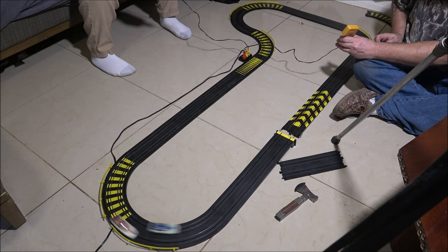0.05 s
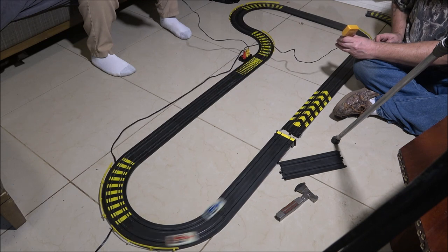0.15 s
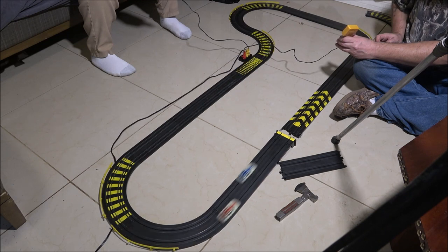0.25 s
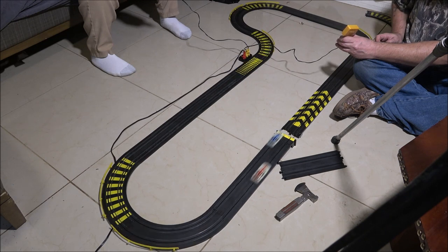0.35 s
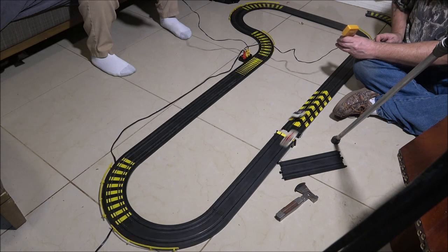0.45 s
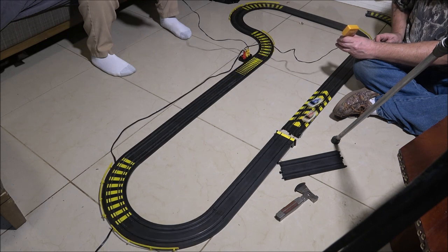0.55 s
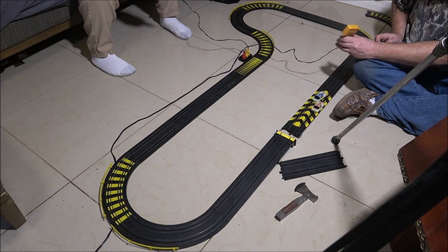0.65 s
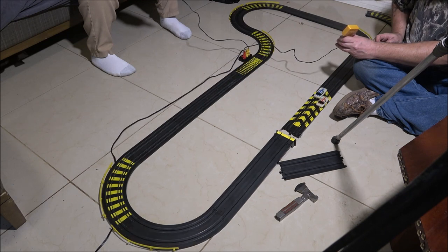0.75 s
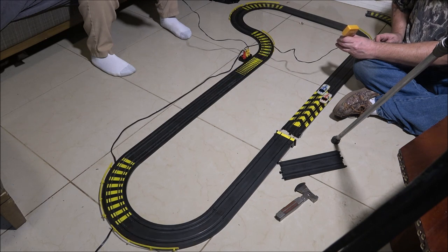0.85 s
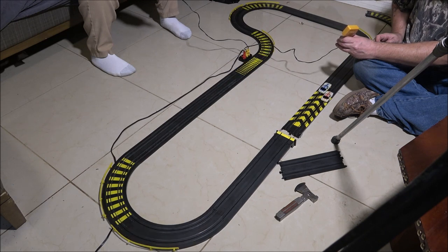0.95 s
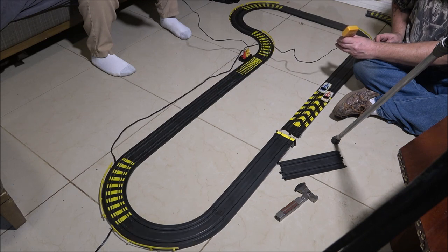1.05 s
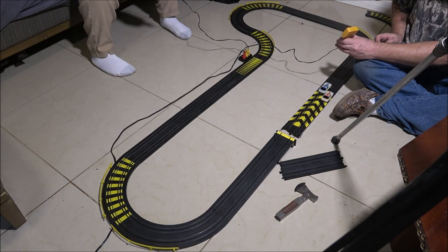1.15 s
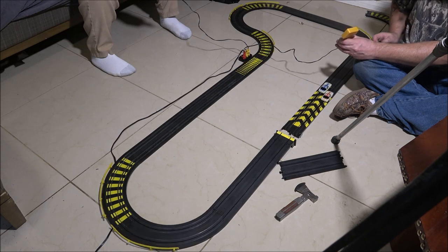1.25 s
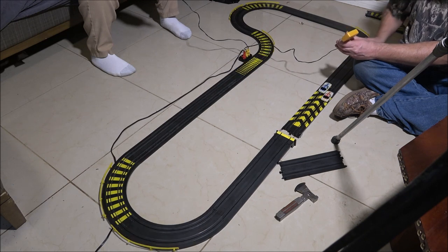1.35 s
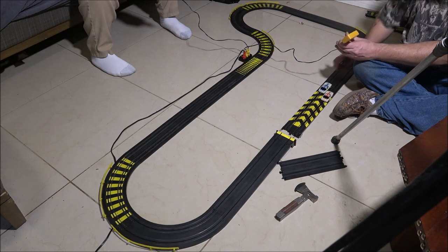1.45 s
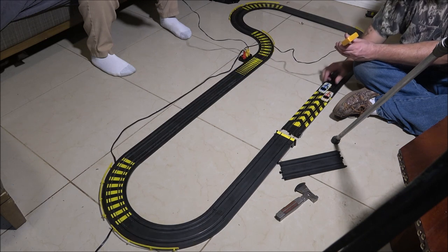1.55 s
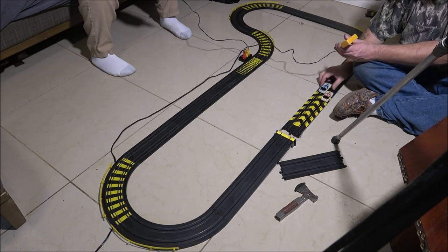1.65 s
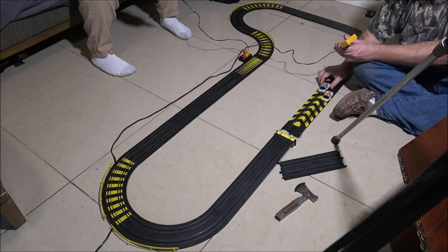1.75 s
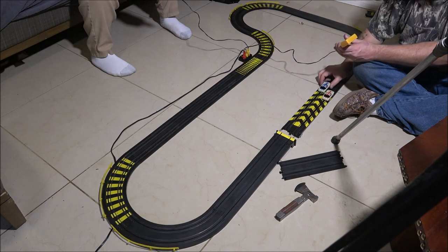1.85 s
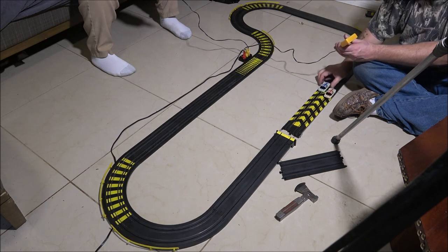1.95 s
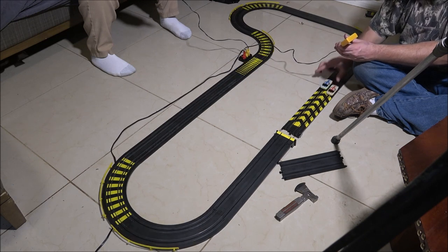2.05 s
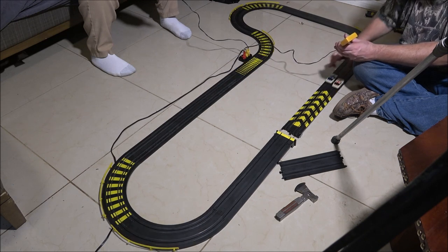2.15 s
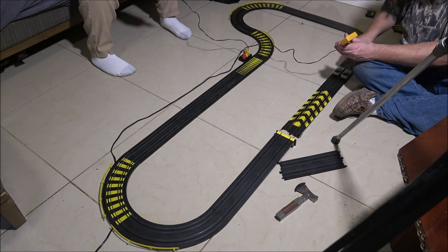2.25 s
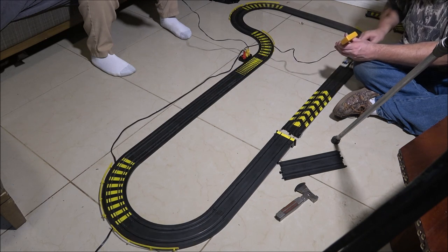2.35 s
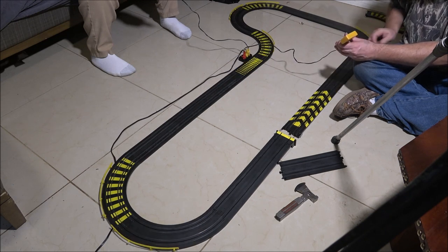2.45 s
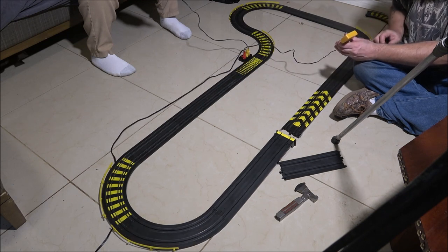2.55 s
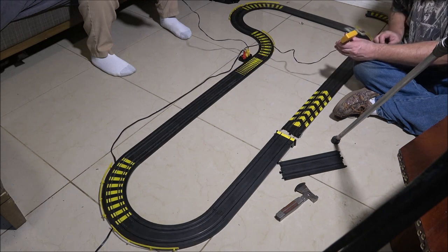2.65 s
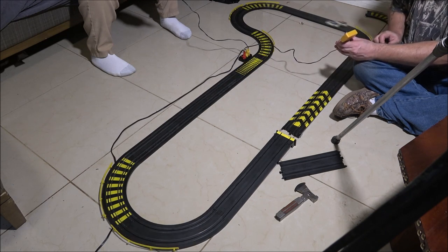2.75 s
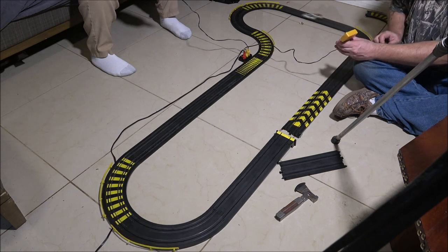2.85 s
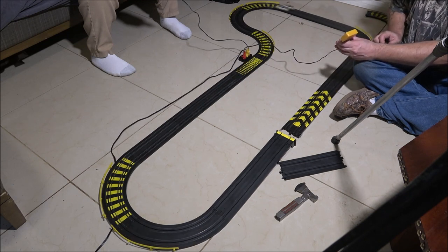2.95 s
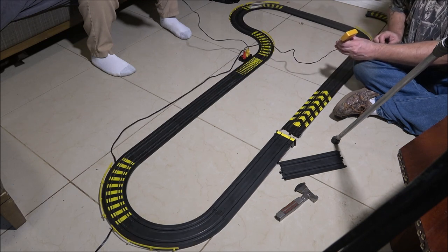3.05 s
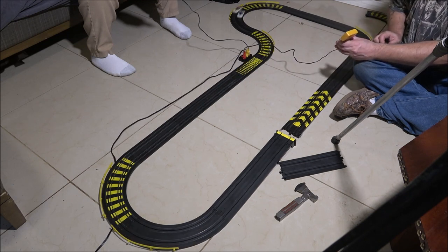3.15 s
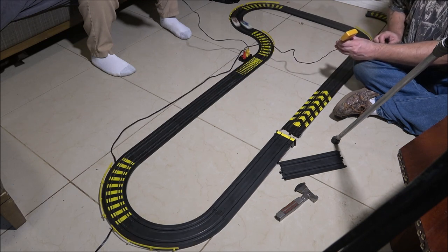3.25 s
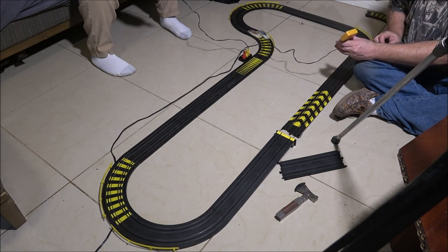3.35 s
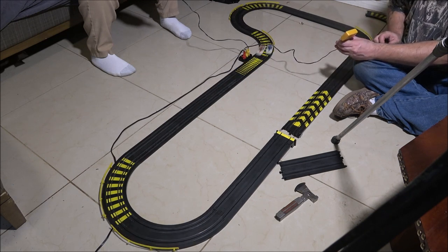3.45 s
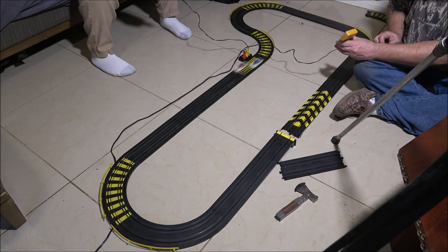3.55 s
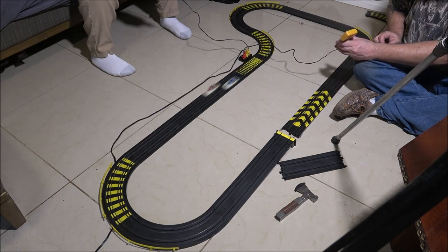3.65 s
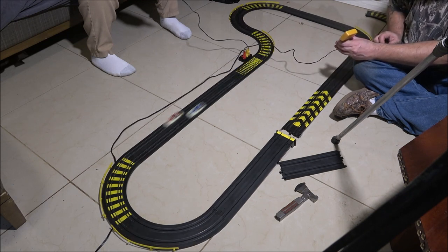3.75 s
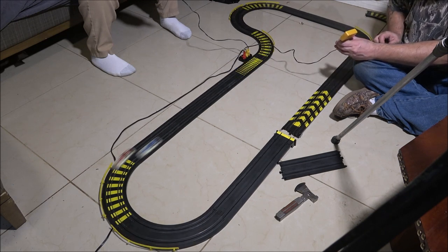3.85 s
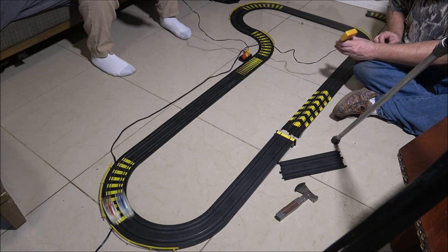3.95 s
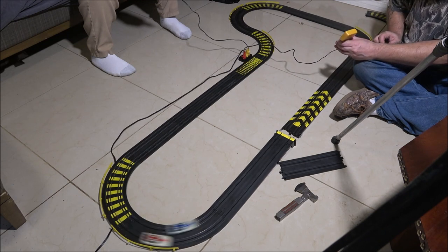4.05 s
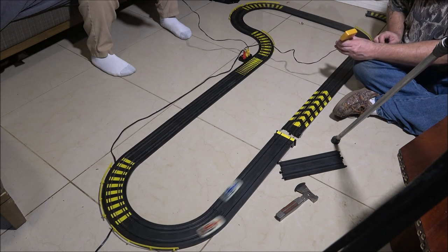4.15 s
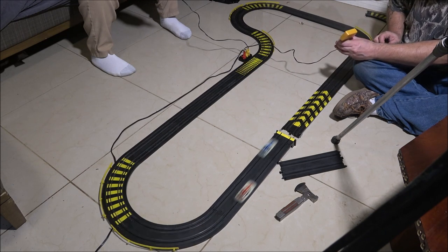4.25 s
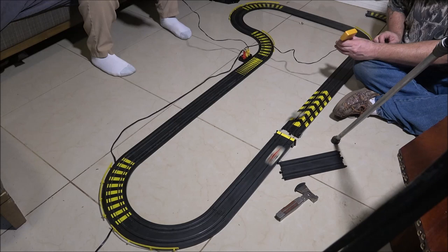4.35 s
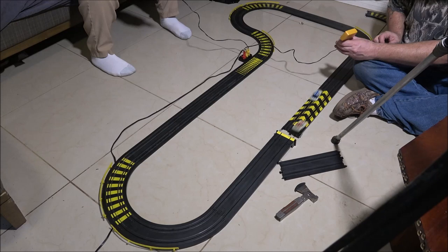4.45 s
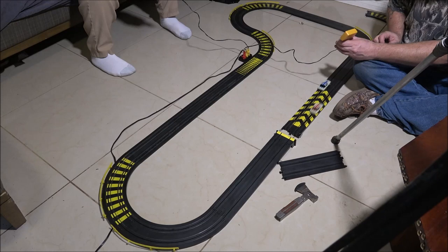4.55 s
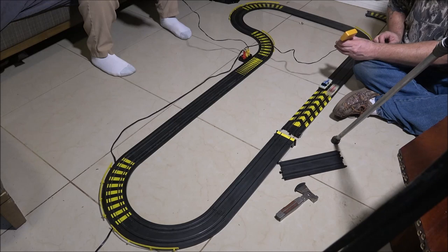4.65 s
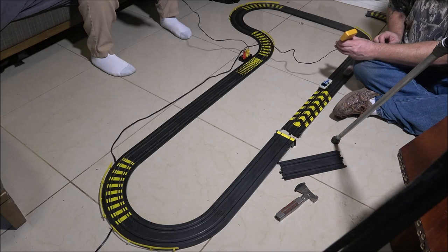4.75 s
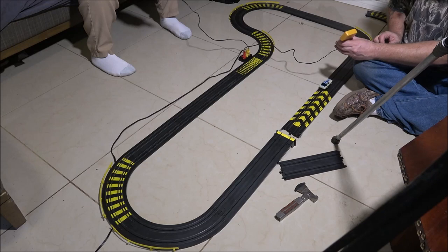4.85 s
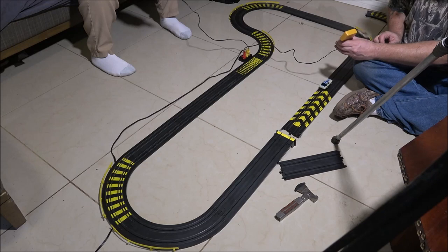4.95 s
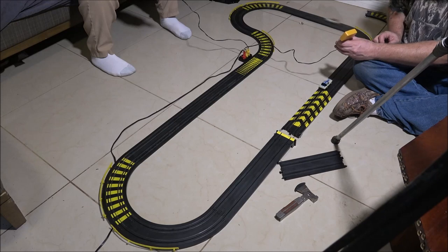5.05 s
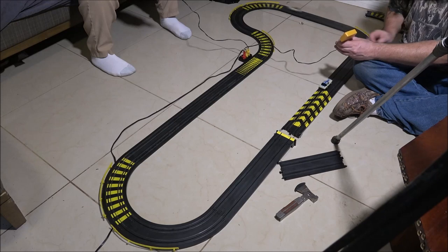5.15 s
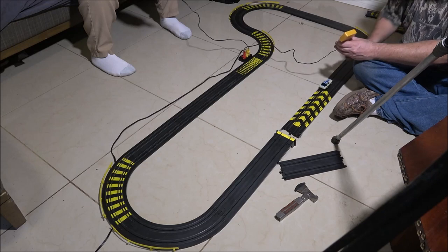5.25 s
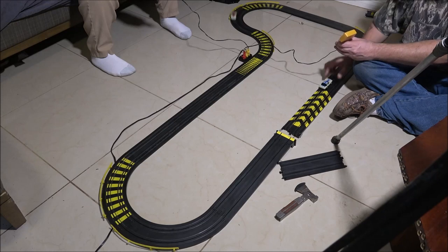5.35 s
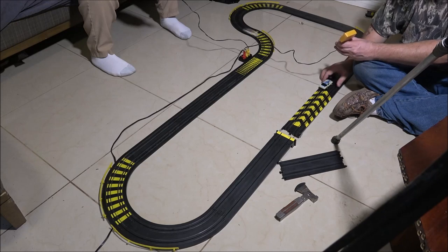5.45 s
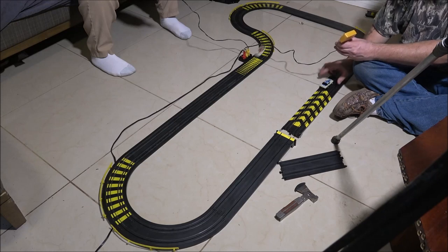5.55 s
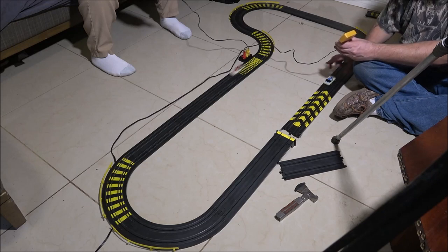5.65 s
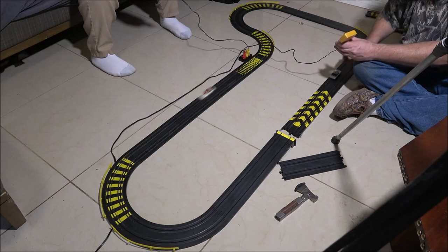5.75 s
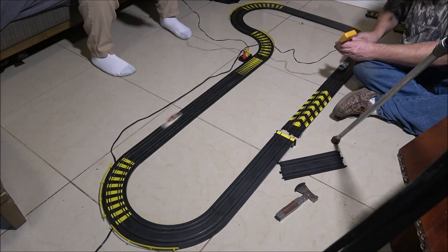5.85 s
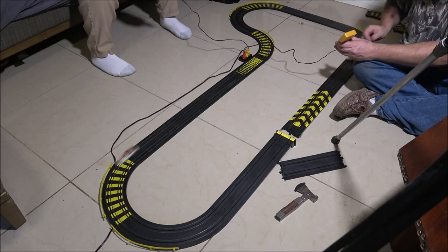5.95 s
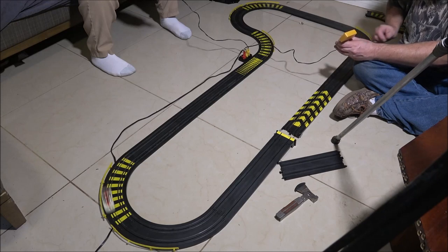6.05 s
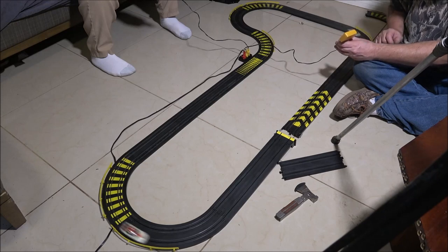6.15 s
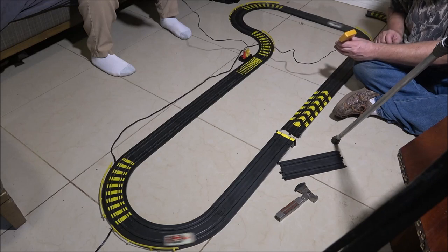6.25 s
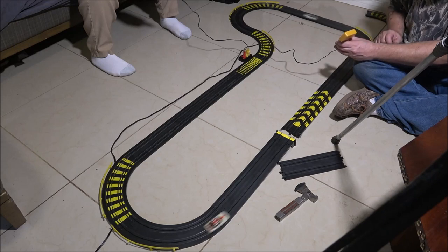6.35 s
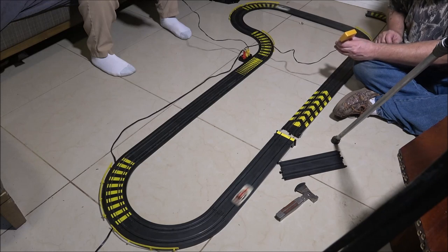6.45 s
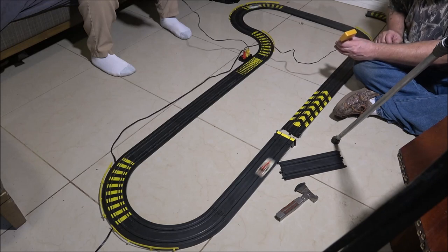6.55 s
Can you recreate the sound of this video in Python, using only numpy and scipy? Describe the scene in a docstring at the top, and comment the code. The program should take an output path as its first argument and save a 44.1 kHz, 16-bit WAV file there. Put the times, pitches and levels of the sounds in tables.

```python
"""Two toy slot cars whirr round a plastic track on a tiled floor, stall, are pushed on by hand and race off.
Two shaky gear tones make the whirr; thousands of tiny random blows make the chatter, scrape and drumming.
Bursts of noise make the clacks over rail joints and the knocks of the plastic bodies.
Dying tones make the floor bumps and the ringing track pieces.
Around them are hard-room echoes, soft air noise, a mains hum and, during the stall, a thin whine."""
import sys
import numpy as np
from scipy import signal
from scipy.fft import rfft, irfft
from scipy.io import wavfile

SR = 44100
rng = np.random.default_rng(int(sys.argv[2]) if len(sys.argv) > 2 else 0)


def int16_out(signal):
    """Quantize to a 16-bit WAV file."""
    q = np.round(np.clip(np.atleast_2d(signal).T, -1, 1) * 32767)
    wavfile.write(sys.argv[1], SR, q.astype(np.int16))


N = 290619
TIME = np.arange(N) / SR
EDGE_HZ = 15880


def amp(db):
    """Turns decibels into a gain."""
    return 10 ** (np.asarray(db) / 20)


def unit(x):
    """Scales a sound to an rms of 1."""
    return x / np.sqrt(np.mean(x ** 2) + 1e-20)


def read(points, hz):
    """Reads a table of pitches and values between its points, on a log-frequency axis."""
    f, value = np.transpose(points)
    return np.interp(np.log(hz + 1), np.log(f + 1), value)


def follow(points):
    """Draws straight lines through a table of times and values, one value per sample."""
    return np.interp(TIME, *np.transpose(points))


def add(mix, s, sound):
    """Mixes a sound in at time s, in seconds."""
    part = mix[max(round(s * SR), 0):][:len(sound)]
    part += sound[:len(part)]


def colour(x, points, tilt_db=0):
    """Filters a sound to a given spectrum without pre-echo, tilted in dB per octave above 500 Hz."""
    hz = abs(np.fft.fftfreq(8192, 1 / SR))
    octaves = np.log2(np.maximum(hz, 500) / 3000)
    log_gain = np.log(amp(read(points, hz) + tilt_db * octaves))
    # this choice of phase puts the filter's energy as early as possible
    response = np.exp(np.conj(signal.hilbert(log_gain)))
    taps = np.fft.ifft(response).real[:4096]
    return signal.oaconvolve(x, taps)[:len(x)]


def wander(hz):
    """Makes a random curve of rms 1 that changes mostly at rates below hz."""
    t = np.arange(16384) / 2400
    rates = np.fft.rfftfreq(len(t), t[1])
    spectrum = rfft(rng.standard_normal(len(t))) / (1 + (rates / hz) ** 4)
    return unit(np.interp(TIME, t, irfft(spectrum)))


def impacts(per_s, spread_db):
    """Scatters tiny blows of uneven size and random sign."""
    sizes = amp(spread_db * np.minimum(rng.exponential(1, N), 4)) * rng.choice([-1, 1], N)
    return sizes * (rng.random(N) < per_s / SR)


def track_ring(x, ring_db):
    """Adds the ringing of the track to a blow: each mode is a sine that dies away, faster if it is wide."""
    # ringing of the track pieces: pitch_hz, width_hz, level_db [relative]
    track_modes = [(1020, 16, -6), (1156, 9.8, -15), (1850, 67, -1), (2350, 150, -1.5), (2740, 80, -31),
                   (3670, 1200, 8)]
    t = np.arange(SR // 8) / SR
    modes = np.zeros(len(t))
    for hz, width, db in track_modes:
        decay = np.exp(-np.pi * width * t)
        modes += amp(db) * np.sqrt(width) * decay * np.sin(2 * np.pi * hz * t)
    ring = signal.oaconvolve(x, modes / np.linalg.norm(modes))[:len(x)]
    return x + amp(ring_db) * ring


def reflections(x):
    """Makes the dense echoes of the room, each pitch range dying at its own rate."""
    # echo life: pitch_hz, time_to_fall_60_db_s
    echo_times = [(200, 0.29), (1300, 0.27), (3500, 0.35), (9000, 0.16), (16000, 0.23)]
    length = SR // 3
    taps = rng.standard_normal(length) * (rng.random(length) < .12)
    taps *= np.arange(length) > 150  # a short gap before the first echo
    hz, t, z = signal.stft(taps, SR, nperseg=256)
    fade = amp(-60 * t / read(echo_times, hz)[:, None])
    tail = signal.istft(z * fade, SR, nperseg=256)[1]
    return signal.oaconvolve(x, tail / np.linalg.norm(tail))[:N]


def room(x, wet_db, shifts_per_s=7):
    """Adds three sets of echoes that fade in and out in turn, so the echo pattern keeps shifting."""
    echoes = np.zeros(N)
    for k in range(3):
        echoes += reflections(x * np.cos(np.pi * (shifts_per_s * TIME + k / 3)))
    echoes /= np.sqrt(1.5)
    return (x + amp(wet_db) * echoes) / np.hypot(1, amp(wet_db))


def swells(rows):
    """Makes dB curves that rise and fall smoothly around each pass, one for each gain column."""
    return sum(np.outer(dbs, np.exp(-((TIME - s) / half) ** 2)) for s, half, *dbs in rows)


def gears(mesh, jitter, overtone_db):
    """Whirrs like one car: the tooth rate shakes as wheels grip and slip, and teeth rattle in bursts."""
    hz = follow(mesh) * (1 + jitter * wander(227.0) + .01 * wander(14.3))
    phase = 2 * np.pi * np.cumsum(hz) / SR
    tone = np.sin(phase) + amp(overtone_db) * np.sin(2 * phase)
    return unit(tone * amp(4.7 * np.minimum(wander(164), 2.2)))


def whirr(first_db, second_db):
    """Sounds both cars' gears in the room, each swelling by its own load."""
    # speed of the first car, then of the second: time_s, gear_mesh_hz
    first_mesh = [(0, 1635), (.43, 1372), (.9, 1446), (2.1, 1067), (2.3, 1203), (2.58, 1768), (2.9, 1730),
                  (3.1, 1570), (3.98, 1655), (4.12, 1556), (4.3, 1570), (4.42, 1396), (4.88, 1557),
                  (5.33, 1931), (5.45, 1624), (5.86, 1843), (6.17, 1483), (6.59, 1616)]
    second_mesh = [(0, 1800), (.45, 1750), (1.0, 2150), (2.1, 1850), (2.45, 2300), (3.05, 1780),
                   (3.5, 2280), (3.8, 1900), (4.7, 1600), (5.3, 2200), (5.88, 1330), (6.2, 1650),
                   (6.59, 1800)]
    first = amp(first_db) * gears(first_mesh, jitter=.043, overtone_db=-11.5)
    second = amp(second_db - 2) * gears(second_mesh, jitter=.068, overtone_db=-22)
    return room(first + second, wet_db=-3.0)


def chatter(bounce):
    """Rattles the chassis on the hollow track: random blows that come stronger and weaker with the hops."""
    # tone of the chatter: pitch_hz, level_db [relative, per Hz]
    chatter_tone = [(300, -35.5), (800, -22), (1150, -9.5), (1500, -1), (1850, -1.5), (2400, -3),
                    (2750, -4), (3400, -4), (4200, -9.5), (7000, -21.5), (15000, -24)]
    blows = impacts(2400, spread_db=2.5) * amp(2.45 * bounce + wander(26))
    return unit(room(colour(track_ring(blows, ring_db=-24), chatter_tone), wet_db=0.0))


def shoes(bounce):
    """Scrapes metal pickup shoes on the rails in thousands of tiny ticks, with a treble that dulls and returns."""
    # tone of the scrape: pitch_hz, level_db [relative, per Hz]
    scrape_tone = [(700, -20.5), (2000, -1), (3500, -4), (4500, 0), (6000, 2), (7200, 1), (9000, 1),
                   (11000, -2.5), (13000, -10), (16000, -20.5)]
    # duller during the first run's slowing, bright again by the restart:
    # time_s, share_of_treble_lost [0 to 1]
    dulling = [(.45, 0.2), (.78, 0.36), (2.1, .02)]
    ticks = impacts(4500, spread_db=1.0) * amp(0.5 * bounce + 0.89 * wander(53))
    scrape = room(colour(ticks, scrape_tone), wet_db=-2.5, shifts_per_s=23)
    treble = signal.sosfiltfilt(signal.butter(2, 9500, "high", fs=SR, output="sos"), scrape)
    return unit(scrape - np.clip(follow(dulling), 0, 1) * treble)


def drumming():
    """Drums on hollow pieces of track: random blows, with the lower pitches brought out."""
    # tone of the drumming: pitch_hz, level_db [relative, per Hz]
    drum_tone = [(100, -28), (200, -22), (400, -14), (650, -11.5), (860, -9), (955, 2), (1035, -1.5),
                 (1120, 5.5), (1230, 1), (3000, -54)]
    blows = impacts(2000, spread_db=1.5)
    return unit(room(colour(track_ring(blows, ring_db=-17), drum_tone), wet_db=3))


def cars():
    """Runs whirr, chatter, scrape and drumming at the drive's level, each with its swells; silent in the stall."""
    # how hard the cars are driven, heard as the running level: time_s, level_db
    drive_points = [(0, -25), (.25, -29.5), (.47, -30), (.68, -30.5), (.8, -37.5), (1.03, -47), (1.12, -49),
                    (1.86, -50.5), (2.05, -45.5), (2.13, -36), (2.33, -36), (2.8, -31.5), (3.12, -27),
                    (3.3, -29.5), (3.9, -26.5), (4.45, -29.5), (4.8, -34), (5.36, -28.5), (5.66, -29),
                    (5.8, -31.5), (6.03, -28.5), (6.35, -31), (6.59, -27)]
    # surges as the cars lean into a bend or pull away, each car's gears loaded by its own amount:
    # centre_s, half_length_s, chatter_gain_db, first_whirr_gain_db, second_whirr_gain_db
    surges = [(.04, 0.21, 6, 10.5, -3), (.38, 0.085, 7, 12, 9), (.9, 0.062, -1, 9, 3),
              (2.26, 0.084, 4.5, 4, 13), (2.4, 0.11, 5.5, 14, 15.5), (3.07, 0.057, 6, 9, 4),
              (3.5, 0.064, 3.5, -10, 7.5), (3.79, .08, 6.5, 10, 7), (3.99, 0.08, 7, 8, 12.5),
              (4.13, 0.066, 4.5, 14, 5), (4.31, 0.072, 7, 10, 8), (4.85, 0.084, 2.5, 9.5, 5),
              (5.28, 0.075, 0.5, 10.5, 7), (5.55, 0.046, 3, 5, 7), (5.87, 0.099, 4.5, 9.5, 9),
              (6.06, .04, 5.5, 10, 0), (6.2, 0.073, 4.5, 6, 3), (6.58, 0.069, 5.5, 10, 11)]
    # passes over the bumpy stretch, where the shoes scrape harder: centre_s, half_length_s, gain_db
    bumpy_passes = [(.61, 0.042, 8.5), (4.56, 0.062, 5)]
    # passes over hollow pieces of track that drum: centre_s, half_length_s, gain_db
    hollow_passes = [(.54, .03, 4), (.97, 0.12, 6.5), (2.17, 0.035, 8.5), (3.57, 0.21, 5), (3.82, 0.13, 11),
                     (4.49, 0.048, 11.5), (4.66, 0.031, 6), (5.8, .18, 9)]
    moving = np.interp(TIME, [1.035, 1.1, 1.74, 1.93], [1, 0, 0, 1])
    drive = moving * amp(follow(drive_points))
    surge, first, second = swells(surges)
    bumpy, = swells(bumpy_passes)
    hollow, = swells(hollow_passes)
    bounce = wander(72)  # the light cars hop on the rails
    running = amp(surge) * chatter(bounce)
    running += amp(-10.5) * whirr(first, second)
    running += amp(-0.12 + bumpy) * shoes(bounce)
    running += amp(-12.5 + hollow) * drumming()
    return drive * running


def steady_tones(lines):
    """Sums sine tones, each with a slowly drifting phase; the sqrt(2) makes each level an rms level."""
    return sum(amp(db) * np.sqrt(2) * np.sin(2 * np.pi * hz * TIME + wander(2.7)) for hz, db in lines)


def background():
    """Lays down room air and hiss as coloured noise, mains hum as low sines, and a whine in the stall."""
    # room air and hiss: pitch_hz, level_db [relative, per Hz]
    air_tone = [(20, -7), (60, -8), (88, -19), (150, -7), (400, -7.5), (500, -10), (700, -17), (1500, -19),
                (4000, -23), (9000, -25.5), (15000, -35)]
    # mains hum: pitch_hz, level_db
    hum_lines = [(59, -68.5), (119.8, -65), (177.5, -65.5), (240, -64.5), (360.6, -66)]
    # thin whine while the cars stand still: pitch_hz, level_db
    whine_lines = [(2277, -71), (2585, -74), (2762, -72), (3601, -77)]
    air = amp(-53) * unit(colour(rng.standard_normal(N), air_tone))
    stalled = np.interp(TIME, [1.08, 1.16, 1.56, 1.6], [0, 1, 1, 0])
    return air + steady_tones(hum_lines) + stalled * steady_tones(whine_lines)


def joints():
    """Clacks the metal shoes over gaps between track pieces: short noise buzzes that also ring the track."""
    # shoes hitting rail joints: start_s, level_db [before ringing, colour and room]
    joint_hits = [(.0428, -13.5), (.197, -15.5), (0.2769, -16), (.4045, -13.5), (2.5369, -18.5),
                  (2.7399, -21.5), (2.9059, -17), (2.9866, -13), (3.1395, -13), (3.1674, -15),
                  (3.3233, -15), (3.3586, -10), (3.8392, -14.5), (3.8854, -13.5), (3.924, -13),
                  (4.0303, -11.5), (4.1572, -12.5), (4.2273, -17), (4.3319, -14), (4.9013, -23),
                  (5.1574, -18.5), (5.2181, -17.5), (5.2587, -15.5), (5.343, -11), (5.4815, -10.5),
                  (5.9916, -12), (6.1683, -17.5), (6.4129, -16.5), (6.4911, -15.5)]
    # tone of the clacks: pitch_hz, level_db [relative, per Hz]
    clack_tone = [(300, -42), (1000, -9.5), (2500, -0.5), (4500, -2), (7000, -1), (9500, -1.5),
                  (12000, -6.5), (16000, -12)]
    rise_s, buzz_s = .0012, .017
    out, t = np.zeros(N), np.arange(SR // 8) / SR
    buzz = (1 - np.exp(-t / rise_s)) * np.exp(-(t / buzz_s) ** 1.73)
    for s, db in joint_hits:
        add(out, s, amp(db) * buzz * rng.standard_normal(len(t)))
    return amp(1.0) * room(colour(track_ring(out, ring_db=-23), clack_tone), wet_db=-1.5)


def strike(decay, snap):
    """Makes a blow: a sharp first contact and a dying burst of noise for the rebounds."""
    t = np.arange(SR // 6) / SR
    return rng.standard_normal(len(t)) * np.exp(-t / max(decay, .002)) + snap * (t == 0)


def knocks():
    """Knocks car bodies on the track: each blow stirs one broad resonance; the higher it is, the brighter."""
    # knocks on the bumpy stretch and under the hand, and a short rasp of a car in a bend near 5.6 s:
    # start_s, level_db [before resonance, ringing and room], rattle_decay_s, body_resonance_hz
    knock_hits = [(0.494, -9, 0.01, 2340), (.5284, -11, 0.006, 4540), (.573, -13, 0.011, 5000),
                  (.6094, -13.5, 0.0088, 5600), (.644, -12.5, 0.0065, 4670), (0.758, -25.5, .007, 3420),
                  (1.5988, -26, 0.007, 2380), (1.626, -37.5, 0.025, 1730), (1.688, -37.5, 0.0049, 2600),
                  (1.743, -33.5, 0.0085, 2930), (1.8334, -29, 0.0028, 3100), (1.951, -32.5, 0.0084, 3600),
                  (1.99, -31, .006, 9000), (2.0004, -24.5, 0.005, 8100), (2.007, -25.5, 0.0044, 1710),
                  (2.165, -21, 0.0038, 4960), (4.416, -8.5, 0.0035, 2700), (4.423, -20.5, .014, 2750),
                  (4.46, -10.5, 0.0055, 4730), (4.505, -17.5, 0.0088, 7000), (4.529, -12.5, .007, 7900),
                  (4.573, -14, 0.01, 4550), (4.7104, -21, 0.015, 6400), (5.486, -21, 0.014, 3000),
                  (5.598, -19.5, 0.014, 3280)]
    # tone of a plain knock: pitch_hz, level_db [relative, per Hz]
    knock_tone = [(120, -24.5), (500, -16.5), (1000, -1), (2000, 2.5), (3500, -0.5), (5500, 1.5),
                  (8200, -0.5), (11000, -7.5), (16000, -14)]
    # the tilt grows by this much for each octave of resonance above the plain one
    bright_db_per_octave, plain_body_hz = 1, 3700
    out = np.zeros(N)
    for s, db, decay, body_hz in knock_hits:
        tilt_db = bright_db_per_octave * np.log2(body_hz / plain_body_hz)
        blow = colour(strike(decay, snap=2.9), knock_tone, tilt_db)
        body = signal.lfilter(*signal.iirpeak(body_hz, 3.2, fs=SR), blow)
        add(out, s, amp(db) * (blow + 1.16 * body))
    return amp(1) * room(track_ring(out, ring_db=-22), wet_db=2.0)


def dying_tones(rows, decay, rise):
    """Starts sines softly and lets them die away; decay and rise are in seconds."""
    out, t = np.zeros(N), np.arange(SR // 3) / SR
    shape = np.exp(-t / decay) * (1 - np.exp(-t / rise))
    for s, hz, db in rows:
        add(out, s, 2 * amp(db) * np.sin(2 * np.pi * hz * t) * shape)
    return out


def floor_bumps():
    """Bumps dully on the floor: low tones that die within a fraction of a second."""
    # start_s, pitch_hz, level_db [relative]
    bumps = [(0.551, 157, -54), (4.55, 147, -48.5), (5.48, 160, -54), (5.979, 60.3, -54)]
    return dying_tones(bumps, decay=0.052, rise=0.0031)


def finger_rings():
    """Rings the empty track piece under the fingers: single tones set off by a soft push."""
    # start_s, pitch_hz, level_db [relative]
    rings = [(1.605, 952, -53), (1.62, 1126, -48), (1.835, 1080, -50.5)]
    return dying_tones(rings, decay=0.042, rise=0.0017)


def ports(mid, width):
    """Forms left and right as two close microphones hear them: one shared sound, parted by reflections."""
    side = colour(room(mid, wet_db=14), width)
    return np.array([mid + side, mid - side])


def scene():
    """Places the race by where the cars are, over the quiet room."""
    # width of the race, then of the background and bumps: pitch_hz, side_minus_mid_db
    race_width = [(30, -33), (150, -47), (400, -51), (900, -21.5), (1600, -35), (2800, -24), (4700, -42),
                  (5600, -11.5), (9000, -7.5), (14000, -14.5)]
    air_width = [(30, -29), (90, -19), (500, -17), (3500, -21), (6000, -4), (15000, -5)]
    # where the cars are heard: time_s, left_minus_right_db
    pan = [(0, -0.6), (.35, -1.5), (.6, -2.5), (1.6, -2.5), (2.3, -3), (3.2, -1.4), (4.1, -1.3), (4.5, -2),
           (5.0, -2.9), (5.4, -0.5), (6.1, -1.3), (6.59, -1)]
    # overall lean to one side: pitch_hz, left_minus_right_db
    lean = [(100, -1), (250, 1.5), (1400, 1.47), (5500, 0.1), (10000, -0.5), (14000, 1.5)]
    race = ports(cars() + joints() + knocks() + finger_rings(), race_width)
    race *= amp(np.array([[.5], [-.5]]) * follow(pan))  # half the difference to each side
    left, right = race + ports(background() + floor_bumps(), air_width)
    left = colour(left, [(hz, db / 2) for hz, db in lean])
    right = colour(right, [(hz, -db / 2) for hz, db in lean])
    return np.array([left, right])


def record(dry):
    """Cuts off the treble steeply around EDGE_HZ, as a recorder's band limit does."""
    lowpass = signal.firwin(601, EDGE_HZ, window=("kaiser", 9), fs=SR)
    return signal.oaconvolve(dry, lowpass[None], "same")


dry = scene()
out = record(dry)
int16_out(out)
```